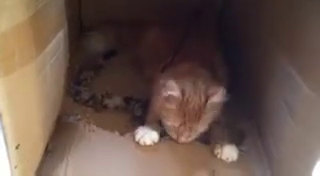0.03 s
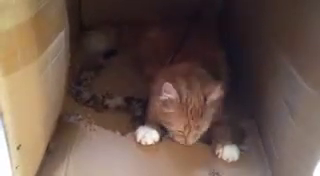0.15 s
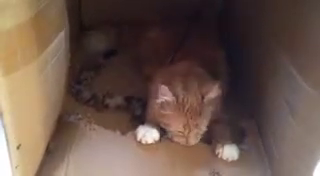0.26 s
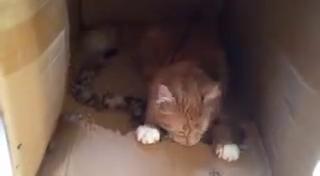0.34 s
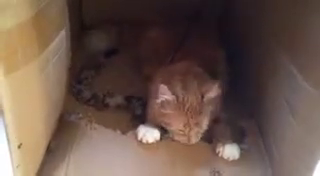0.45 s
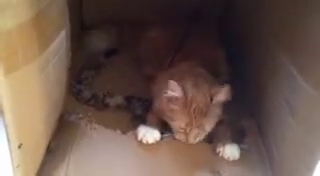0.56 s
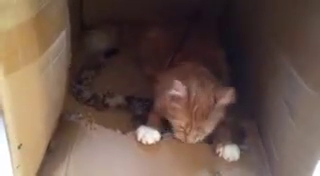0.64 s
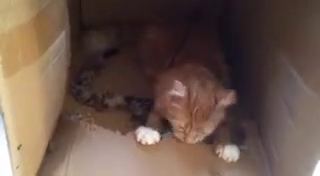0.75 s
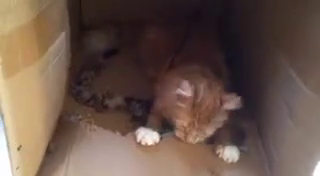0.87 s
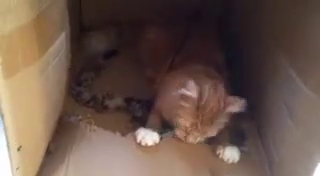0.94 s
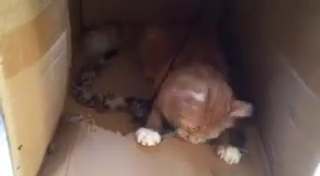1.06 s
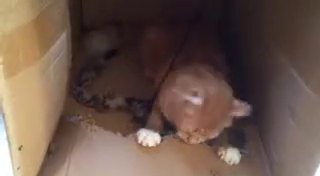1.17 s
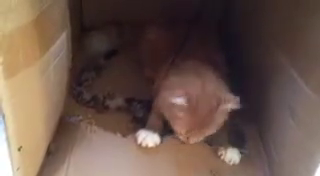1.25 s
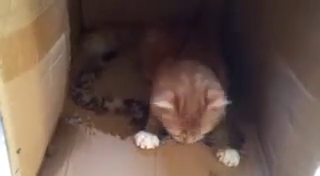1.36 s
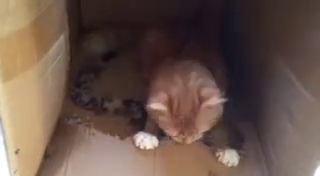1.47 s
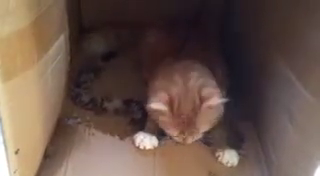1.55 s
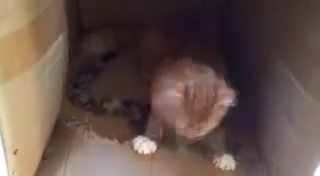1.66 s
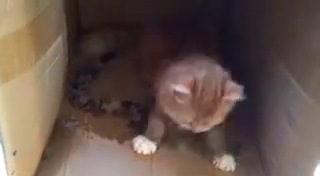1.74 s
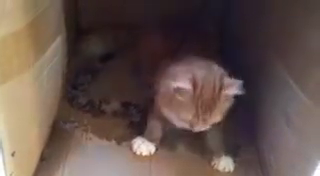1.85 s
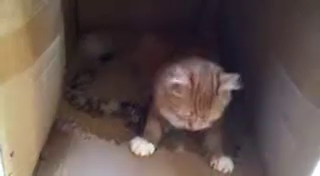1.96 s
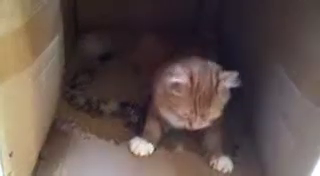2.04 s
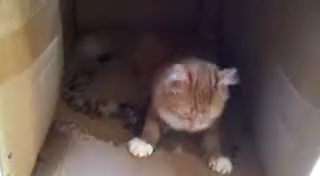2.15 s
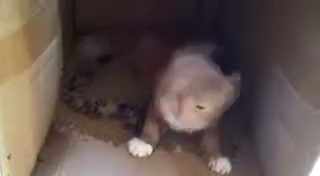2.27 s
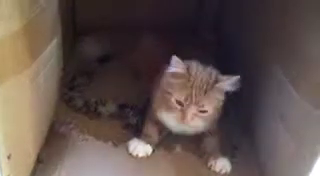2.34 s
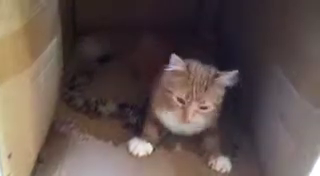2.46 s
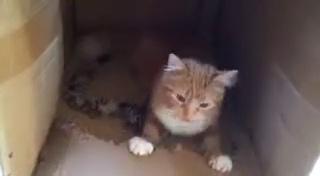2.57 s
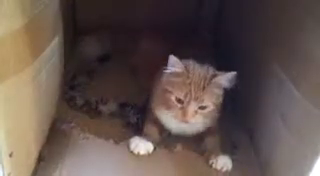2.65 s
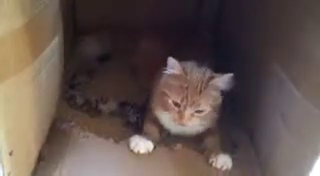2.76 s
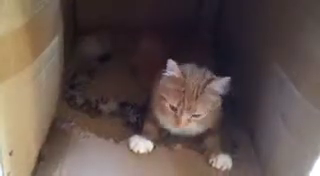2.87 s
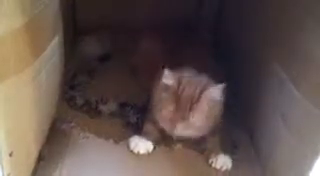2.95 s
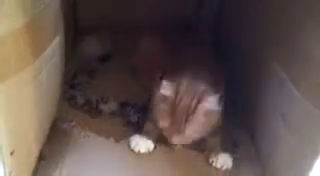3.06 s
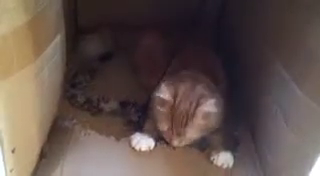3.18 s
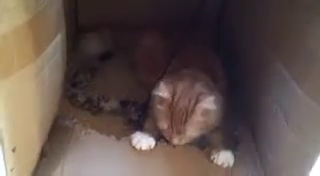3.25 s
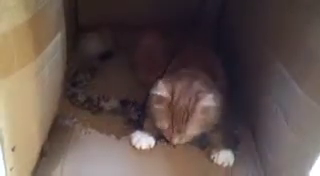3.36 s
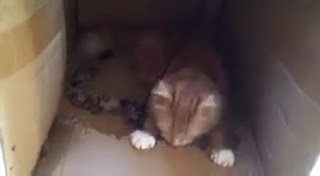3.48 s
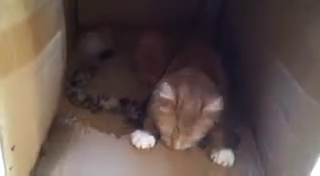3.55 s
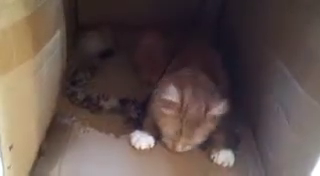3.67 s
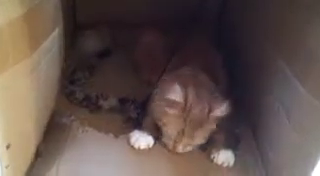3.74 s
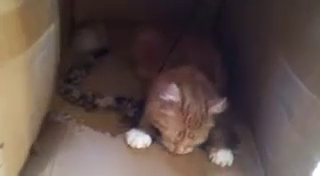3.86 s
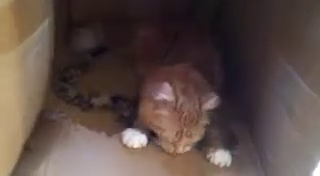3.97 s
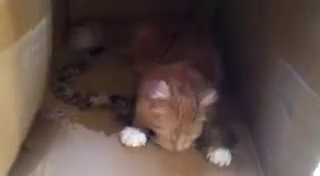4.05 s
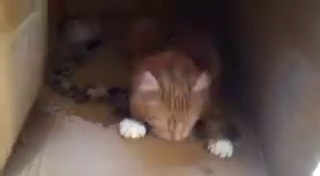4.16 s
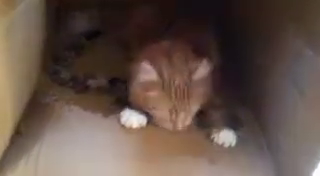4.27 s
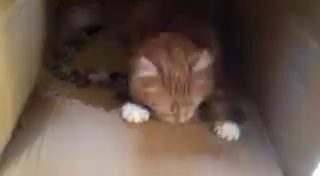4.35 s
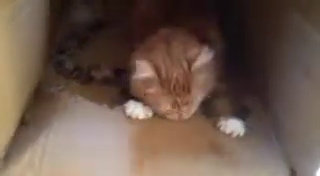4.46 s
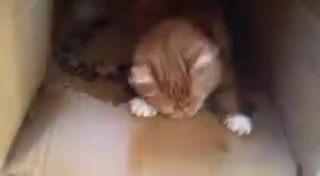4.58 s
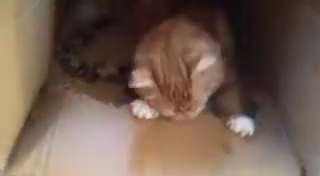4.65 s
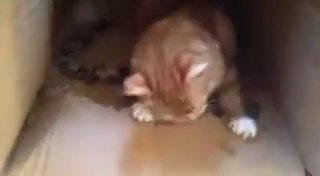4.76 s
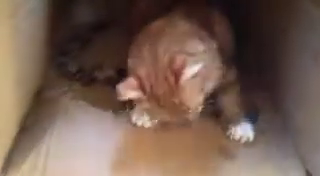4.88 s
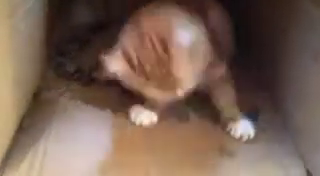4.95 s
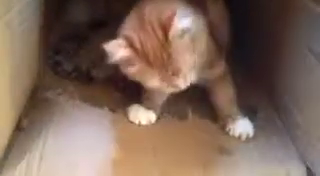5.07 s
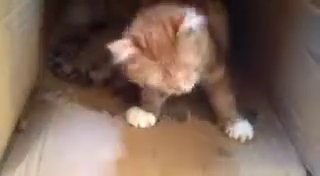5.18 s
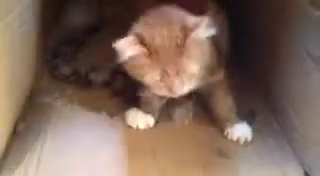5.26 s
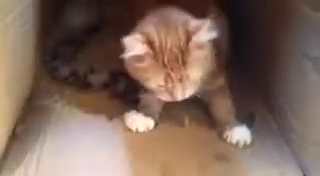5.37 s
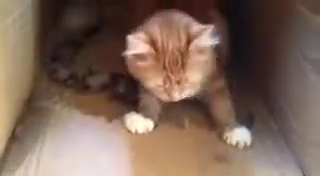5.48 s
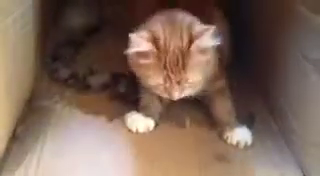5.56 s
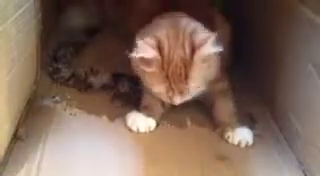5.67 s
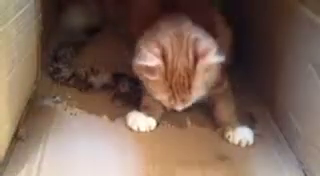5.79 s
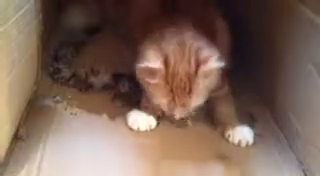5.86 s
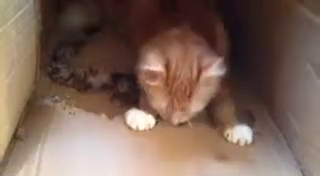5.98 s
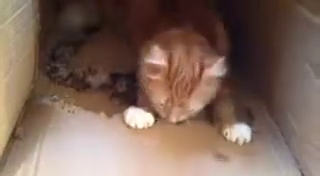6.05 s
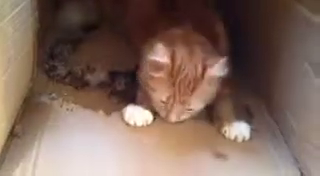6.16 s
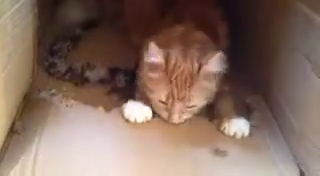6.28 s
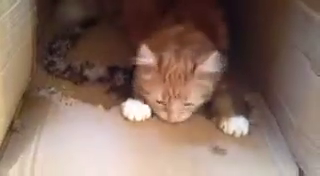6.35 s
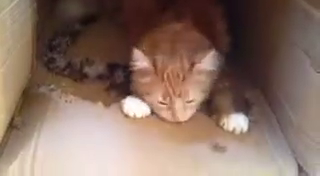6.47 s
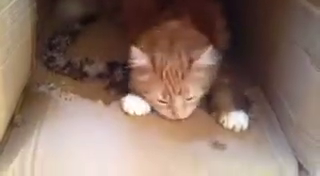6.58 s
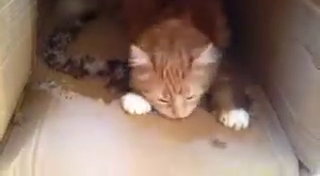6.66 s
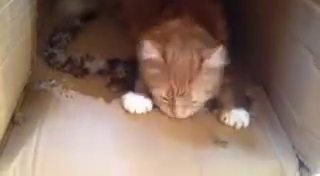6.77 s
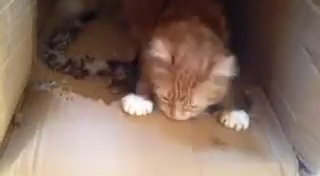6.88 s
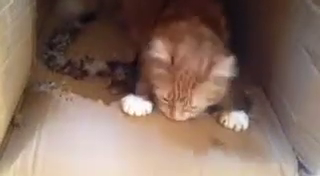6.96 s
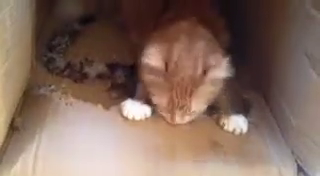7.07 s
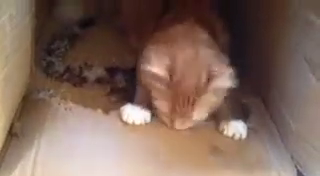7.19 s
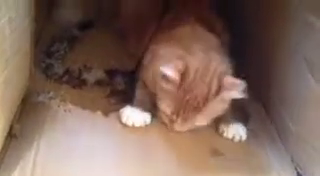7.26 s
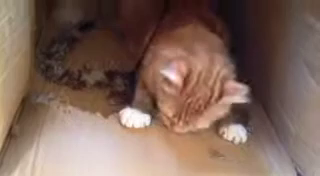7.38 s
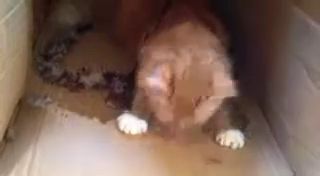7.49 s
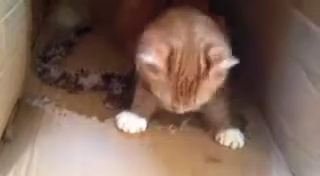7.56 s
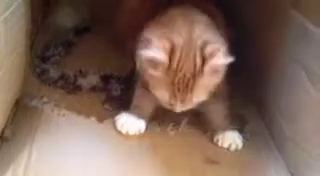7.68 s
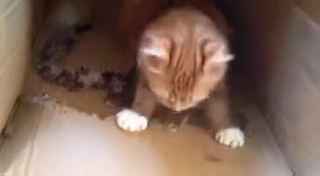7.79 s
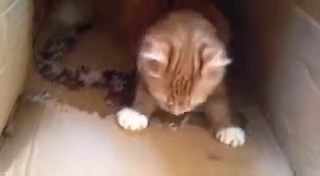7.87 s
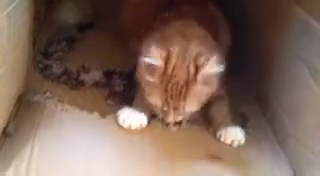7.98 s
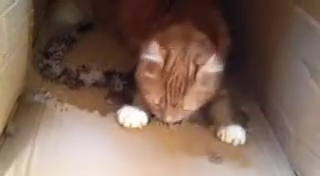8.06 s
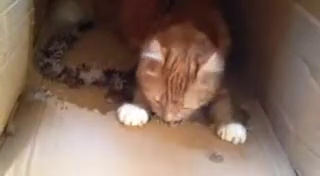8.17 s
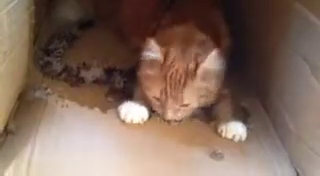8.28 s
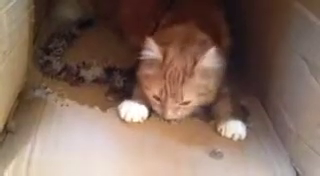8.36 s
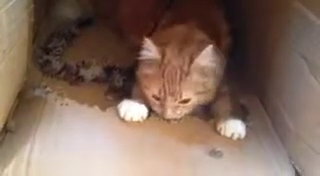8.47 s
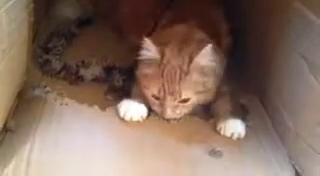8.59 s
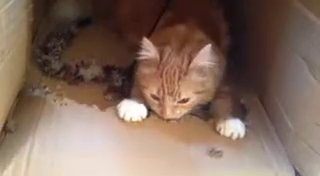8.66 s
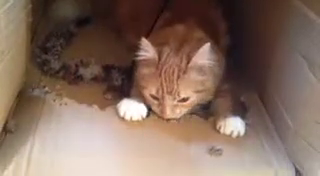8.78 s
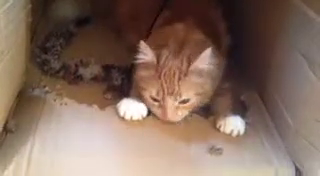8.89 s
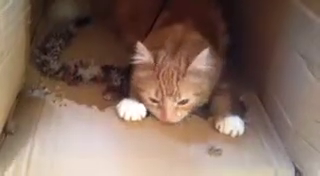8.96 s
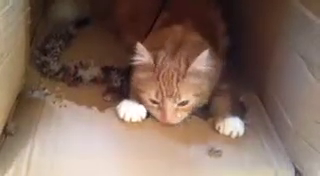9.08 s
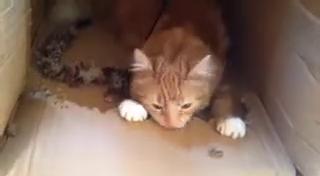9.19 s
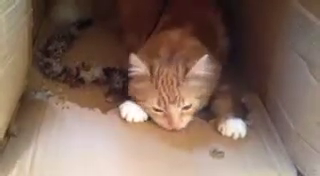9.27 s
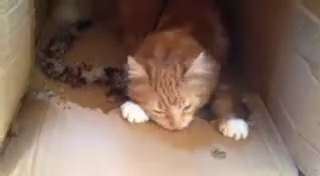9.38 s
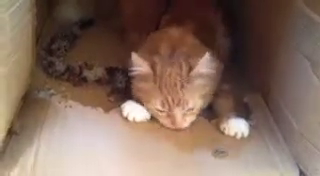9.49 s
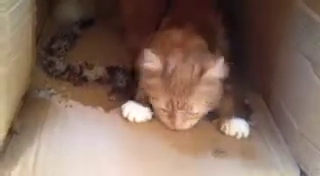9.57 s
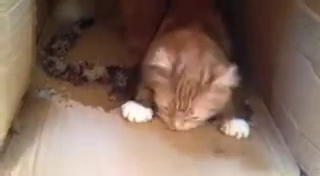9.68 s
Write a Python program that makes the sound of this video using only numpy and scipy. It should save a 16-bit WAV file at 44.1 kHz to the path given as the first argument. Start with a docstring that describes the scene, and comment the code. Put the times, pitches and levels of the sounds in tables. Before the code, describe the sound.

Soft paw scuffs and crackly claw tugs on cardboard, broken three times by a loud, hollow slap as a flap lets go.

```python
"""A kitten claws at the torn floor of a cardboard box, in bouts of tugging that build up.
Paper fibres break in short rips and ticks that ring the board; paws rub and sweep over it.
Three times the strained flap lets go and slaps down with a hollow thump.
A quiet, bare room answers each sound, over a soft steady background."""
import sys
import numpy as np
from scipy import signal
from scipy.fft import rfft, irfft
from scipy.io import wavfile

SR = 44100
rng = np.random.default_rng(int(sys.argv[2]) if len(sys.argv) > 2 else 0)


def unload_audio(sound):
    """Save the sound as a 16-bit wav file, at the path given as the first command line argument."""
    columns = np.transpose(np.atleast_2d(sound))
    # keep every value between -1 and 1, then stretch to whole-number steps
    steps = np.round(np.clip(columns, -1, 1) * 32767)
    wavfile.write(sys.argv[1], SR, steps.astype(np.int16))


N = 429093
LEAD_S = 0.02   # run-up ahead of each rip

# spectrum of a breaking fibre: freq_hz, density_db
FIBRE_SPECTRUM = [(60, -22), (110, -15), (170, 7.5), (320, -2), (700, -3), (1400, -1), (2500, -5),
                  (5000, -4.5), (8500, -4), (9600, -7.5), (11000, -22), (12500, -30)]
# flap slaps: start_s, thump_db, landing_delay_s, landing_db, bite_db, edge_hz, edge_db
FLAP_SLAPS = [(1.6994, -12.5, 0.016, -22, -3, 450, -16.5), (4.9264, -14.5, 0.0095, -25.5, 1, 1077, -16.5),
              (7.541, -14, .006, -19, -11, 1530, -43)]


def from_db(db):
    """Decibels to gain."""
    return 10 ** (np.asarray(db) / 20)


def unit_rms(x):
    """Scale each row to rms 1."""
    return x / np.sqrt(np.mean(x ** 2, axis=-1, keepdims=True) + 1e-30)


def at_hz(points, hz):
    """Read a table on a log-frequency axis."""
    freq_hz, value = np.transpose(points)
    return np.interp(np.log(np.maximum(hz, 1)), np.log(freq_hz), value)


def butter(x, hz, kind, order=2):
    """Causal Butterworth filter."""
    return signal.sosfilt(signal.butter(order, hz, kind, fs=SR, output="sos"), x + 1e-18)


def min_phase(spectrum, size=4096):
    """Minimum-phase impulse response of a spectrum."""
    cepstrum = irfft(np.log(from_db(at_hz(spectrum, np.fft.rfftfreq(size, 1 / SR)))))
    cepstrum[1:size // 2] *= 2
    cepstrum[size // 2 + 1:] = 0
    return irfft(np.exp(rfft(cepstrum)))


def resonate(x, hz, width_hz, lift_db):
    """A resonance lifts one band."""
    r, angle = np.exp(-np.pi * width_hz / SR), 2 * np.pi * hz / SR
    ring = signal.lfilter([1, 0, -1], [1, -2 * r * np.cos(angle), r * r], x) * (1 - r * r) / 2
    return x + (from_db(lift_db) - 1) * ring


def drift(per_s):
    """Slow random curve, rms 1."""
    knots = rng.standard_normal(4000)
    return unit_rms(np.interp(np.arange(N) / SR * per_s, np.arange(len(knots)), knots))


def add(out, start_s, sound):
    """Mix a sound in at start_s."""
    start = max(round(start_s * SR), 0)
    out[start:start + len(sound)] += sound[:max(N - start, 0)]


def room_air(level_db=-68):
    """Soft steady background of the room."""
    # still air: freq_hz, density_db
    air_spectrum = [(30, -36), (45, -25), (65, -13), (90, -4), (180, 4), (260, -0.5), (400, -10),
                    (1000, -11), (2400, -14), (4000, -17.5), (8000, -25), (10000, -33), (12500, -43)]
    noise = signal.oaconvolve(rng.standard_normal(N), min_phase(air_spectrum))[:N]
    return from_db(level_db) * unit_rms(noise)


def room_reverb(x, first_echo_s=0.0094, build_s=0.0024):
    """Diffuse echoes build after the first wall; each band dies at its own pace."""
    # room decay: freq_hz, t60_s
    decay_times = [(100, 0.44), (230, 0.64), (700, 0.94), (1800, 0.89), (4800, 0.77), (9000, 0.43)]
    # reverb against direct sound: freq_hz, level_db
    reverb_levels = [(90, -10), (150, -12.5), (200, -6), (255, -3), (340, -11), (1000, -12), (3000, -12.5),
                     (9000, -15.5)]
    t = np.arange(SR) / SR
    white = rng.standard_normal((2, SR))
    edges_hz = np.geomspace(70, 13000, 30)
    onset = 1 - np.exp(-np.maximum(t - first_echo_s, 0) / build_s)
    tail = np.zeros(SR)
    for k, (low, high) in enumerate(zip(edges_hz, edges_hz[1:])):
        hz = np.sqrt(low * high)
        decay = np.exp(-np.log(1000) * t / at_hz(decay_times, hz))
        band = butter(white[k % 2], [low, high], "band", order=3) * onset * decay
        tail += from_db(at_hz(reverb_levels, hz)) * np.sqrt(2 * (high - low)) / SR * unit_rms(band)
    return signal.oaconvolve(x, tail)[:N]


def box_walls(x, delay_range_s=(0.0012, 0.011), echo_db=-13, bounce_db=-0.5, lowest_hz=600, count=7):
    """Close walls add quick, hollow echoes; lows pass through the card."""
    delays_s = np.sort(rng.uniform(*delay_range_s, count))
    gains = from_db(bounce_db * np.arange(count))
    gains = from_db(echo_db) * gains / np.linalg.norm(gains)
    out, reflected = x.copy(), butter(x, lowest_hz, "high")
    for delay_s, gain in zip(delays_s, gains):
        add(out, delay_s, gain * reflected)
    return out / np.sqrt(1 + np.sum(gains ** 2))


def box_responses(snap, panel_hz=(126, 311), board_top_hz=2620, spot_db=1.5, detune=0.022):
    """A snap as panel boom, board rasp and paper crackle; each spot rings its own way."""
    # box resonances: freq_hz, width_hz, lift_db
    box_modes = [(209.4, 28, 5), (400, 64.5, 11.5), (598, 89, 9), (858, 140, 7), (1144, 82, 6),
                 (1738, 58, 8), (2026, 90, 1.5), (2277, 110, 5), (2635, 52, 3), (2950, 60, 6),
                 (3774, 540, 4.5), (4850, 560, 4.5), (6100, 320, 2), (7470, 2100, 6)]
    for hz, width_hz, lift_db in box_modes:
        pitch_dev, lift_dev = rng.standard_normal(2)
        snap = resonate(snap, hz * (1 + detune * pitch_dev), width_hz, lift_db + spot_db * lift_dev)
    boom = butter(snap, panel_hz, "band", order=3)
    rasp = butter(snap, [panel_hz[1], board_top_hz], "band", order=4)
    crackle = butter(snap, board_top_hz, "high", order=4)
    return boom, rasp, crackle


def fibre_breaks(per_s, spread_db, size):
    """Fibres give way at random: many small impulses, a few large."""
    chance, strength, sign = rng.random((3, size))
    out, breaks = np.zeros(size), chance < per_s / SR
    level_db = spread_db * np.minimum(-np.log(1 - strength[breaks]), 4)
    out[breaks] = from_db(level_db) * np.sign(sign[breaks] - 0.5)
    return out


def paw_gains(rest_db=-75, fade_db_per_s=198.5, sweep_edge_db=3.5, boom_db=-6.5, boom_loss=0.8):
    """Boom, rasp and crackle gains from rest, tugs and sweeps. Bite is crackle over rasp."""
    # bouts of tugging, one curve each: time_s, rasp_db, crackle_db
    tug_bouts = [
        [(0.0, -63, -64), (0.59, -61.5, -67.5), (0.706, -61, -87.5), (0.832, -62.5, -62.5), (1.114, -62, -60.5),
         (1.396, -66.5, -63.5), (1.66, -67, -58)],
        [(3.92, -65, -78), (4.232, -53, -55.5), (4.32, -55.5, -59.5), (4.392, -55, -65), (4.564, -65, -56),
         (4.784, -52, -49.5), (4.9, -53.5, -46)],
        [(5.75, -67, -70.5), (6.402, -63, -58), (6.562, -63, -68.5), (6.936, -54.5, -52.5), (7.2, -57.5, -57.5),
         (7.386, -56, -56.5), (7.51, -51.5, -52)],
        [(7.95, -63.5, -68), (8.212, -57.5, -61), (8.45, -75, -73)],
        [(9.12, -57.5, -67.5), (9.188, -54, -60), (9.33, -57, -64.5), (9.436, -57, -64), (9.568, -51.5, -54.5),
         (9.73, -46, -48)],
    ]
    # paw sweeps over the floor: centre_s, half_length_s, level_db, bite_db
    paw_sweeps = [(0.057, 0.034, -67.5, -20), (0.19, 0.026, -59, -2), (0.285, 0.028, -66, -12),
                  (0.552, 0.075, -61.5, -6.5), (0.666, 0.04, -54, -1), (0.819, 0.01, -65.5, 9),
                  (1.483, 0.021, -63.5, 9), (2.306, 0.03, -68, 0), (2.923, 0.045, -73, 2.5),
                  (3.297, 0.12, -70, 1.5), (3.635, 0.064, -62.5, -4.5), (3.92, 0.057, -60.5, -4.5),
                  (4.11, 0.056, -54.5, -9), (4.442, .035, -57, -3), (4.52, 0.052, -55.5, 3.5),
                  (6.365, 0.037, -57, -12), (6.475, 0.033, -52.5, -6), (7.11, 0.05, -49.5, -4.5),
                  (8.085, 0.052, -61.5, -6), (8.34, 0.03, -60.5, -7.5), (8.879, 0.025, -55.5, -3.5),
                  (9.214, 0.058, -55.5, -8.5), (9.423, 0.037, -49.5, -5)]
    t = np.arange(0, N, 40) / SR
    moves = [(np.full(len(t), rest_db), -0.5)]   # rasp_db, bite_db
    for bout in tug_bouts:
        time_s, rasp_db, crackle_db = np.transpose(bout)
        rasp_db = np.interp(t, time_s, rasp_db) - 2.5
        crackle_db = np.interp(t, time_s, crackle_db) - 2.07
        outside_s = np.abs(t - np.clip(t, time_s[0], time_s[-1]))
        moves.append((rasp_db - fade_db_per_s * outside_s, crackle_db - rasp_db))
    for centre_s, half_length_s, level_db, bite_db in paw_sweeps:
        distance = np.minimum(np.abs(t - centre_s) / half_length_s, 10)
        moves.append((level_db - sweep_edge_db * distance ** 2, bite_db))
    # a flat paw booms the panel; biting claws less so
    power = sum(from_db([db + boom_db - boom_loss * bite_db, db, db + bite_db]) ** 2
                for db, bite_db in moves)
    return [np.interp(np.arange(N) / SR, t, gain) for gain in np.sqrt(power)]


def paw_rubbing(uneven_db=2.5, wander_db=4.5, snag_db=4, snag_s=0.0031, trim_db=-1, spots=3):
    """Paws and fur drag on paper: dense tiny slips under uneven pressure, with brief claw snags."""
    grip_db = uneven_db * drift(per_s=67)
    layers = np.zeros((3, N))
    for _ in range(spots):
        catches = np.abs(fibre_breaks(per_s=14, spread_db=1, size=N))
        snags = signal.lfilter([1], [1, -np.exp(-1 / (snag_s * SR))], catches + 1e-18)
        slips = fibre_breaks(per_s=2400, spread_db=3, size=N)
        slips *= from_db(grip_db + wander_db * drift(per_s=14))
        slips *= 1 + from_db(snag_db) * snags
        for layer, response in zip(layers, box_responses(min_phase(FIBRE_SPECTRUM))):
            layer += signal.oaconvolve(slips, response)[:N]
    return from_db(trim_db) * sum(gain * unit_rms(layer) for layer, gain in zip(layers, paw_gains()))


def flap_thumps(sharpness=3.8, edge_swell_cycles=2.2, size=4096):
    """The slapped floor pumps the box's air for a few swings while the flap's edge rings."""
    # floor modes: freq_hz, relative_db, swell_s
    floor_modes = [(203.4, 3, 0.0068), (138, -9.5, 0.013)]
    out, t = np.zeros(N), np.arange(size) / SR
    for start_s, thump_db, *_, edge_hz, edge_db in FLAP_SLAPS:
        modes = [(hz, thump_db + db, swell_s) for hz, db, swell_s in floor_modes]
        modes.append((edge_hz, edge_db, edge_swell_cycles / edge_hz))
        for hz, db, swell_s in modes:
            envelope = (t / swell_s * np.exp(1 - t / swell_s)) ** sharpness
            add(out, start_s, from_db(db) * envelope * np.sin(2 * np.pi * hz * t))
    return butter(out, hz=110, kind="high", order=6)


def strip_snap(strip_hz, ring_db, q=6.5, tilt_from_hz=4000):
    """A torn strip rings at its own pitch; long, low strips fizz less than short ones."""
    hz, density_db = np.transpose(FIBRE_SPECTRUM)
    db_per_octave = 3 * np.clip(np.log2(strip_hz / tilt_from_hz), -1, 1)
    tilt_db = db_per_octave * np.maximum(np.log2(hz / tilt_from_hz), 0)
    snap = min_phase(np.column_stack([hz, density_db + tilt_db]))
    return resonate(snap, strip_hz, strip_hz / q, ring_db)


def rip(snap, level_db, bite_db, boom_db, length_s, linger_s=0.012, creep_s=0.0037, size=4096):
    """A run of fibres breaks; boom and bite are relative to level_db. One row per box side."""
    t = np.arange(size) / SR - LEAD_S
    after_s = np.maximum(t, 0)
    progress = after_s / length_s
    onset = 1 - np.exp(-progress / 0.057)
    main_run = np.exp(-1.66 * progress ** 2)
    stragglers = 0.19 * np.exp(-after_s / (length_s + linger_s))
    weakest_fibres = 0.17 * np.exp(-np.abs(t) / creep_s)
    strain = onset * (main_run + stragglers) + weakest_fibres
    gains = from_db(level_db + np.array([boom_db, 0, bite_db])) * np.sqrt(length_s * SR / size)
    responses = box_responses(snap)
    bursts = strain * np.array([fibre_breaks(per_s=6000, spread_db=4.5, size=size) for _ in range(3)])
    bands = [signal.fftconvolve(bursts, response[None], axes=1)[:, :size] for response in responses]
    return sum(gain * unit_rms(band) for band, gain in zip(bands, gains))


def claw_tick(level_db, bite_db, base_hz=3100, top_hz=7500, bite_db_per_octave=10):
    """A claw tip plucks one small strip; a sharper bite rings higher."""
    strip_hz = min(base_hz * 2 ** (bite_db / bite_db_per_octave), top_hz)
    return rip(strip_snap(strip_hz, ring_db=8), level_db, bite_db, boom_db=-14, length_s=0.0047)


def clawing():
    """Rips, flap landings and claw ticks all break fibres. One row per box side."""
    # claws rip the board: start_s, length_s, level_db, boom_db, bite_db, strip_hz
    claw_rips = [(0.191, 0.025, -51.5, 1, -5.5, 1080), (0.777, 0.0036, -46, -4, -3, 1620),
                 (1.697, .004, -29.5, -2.5, -20, 470), (1.7024, 0.0092, -21, -15.5, -8.5, 440),
                 (4.166, 0.0097, -45.5, -12.5, -2, 770), (4.178, 0.013, -45, -4.5, 0.5, 2100),
                 (4.186, .012, -41.5, 0, -5.5, 1020), (4.253, 0.0067, -46, 1.5, -9, 1890),
                 (4.319, 0.0076, -43.5, -7.5, -9.5, 437), (4.343, .0085, -45.5, -8.5, -1, 5350),
                 (4.366, 0.0092, -41.5, 6.5, -5, 417), (4.393, .007, -43, -13, -4, 1840),
                 (4.539, .009, -38.5, -12.5, 3, 5840), (4.636, 0.011, -48, -9.5, -30, 620),
                 (4.701, 0.0049, -42.5, -29, -0.5, 1030), (4.754, 0.0043, -32, -34.5, -2.5, 1040),
                 (4.849, 0.0041, -45, -23.5, -4, 1200), (4.923, 0.0084, -22.5, -11.5, -2.5, 1105),
                 (4.929, 0.0023, -19, 2, 2, 700), (6.514, 0.012, -48, -2, -15, 604),
                 (6.594, 0.012, -43.5, -2.5, -3.5, 560), (6.66, 0.024, -41, -6.5, -0.5, 2860),
                 (6.706, 0.0073, -46, -1, -11, 604), (6.769, 0.0046, -36.5, -5.5, -8, 557),
                 (6.849, 0.027, -47, -3.5, -4.5, 1190), (6.897, 0.024, -39.5, -1, -2.5, 1790),
                 (6.951, 0.012, -48, -0.5, -11, 485), (7.051, 0.011, -38, -6, -3.5, 1850),
                 (7.091, 0.009, -46, -11, -6.5, 1920), (7.266, 0.018, -46, -2.5, 1, 2060),
                 (7.3768, 0.0034, -19.5, -10, -4, 1290), (7.5377, 0.0054, -19, -19, -2.5, 1550),
                 (8.898, 0.0053, -43, -4, -11.5, 1140), (9.379, 0.025, -43.5, -9.5, -4, 1120),
                 (9.41, 0.004, -37.5, -4, 0, 2410), (9.436, 0.013, -39.5, -21, -3, 1080),
                 (9.455, 0.012, -46.5, -10, -0.5, 1170), (9.53, 0.0052, -44.5, 2, -0.5, 2880),
                 (9.557, 0.025, -51, -3, -0.5, 4670), (9.613, 0.0096, -42, -3, -9, 1050),
                 (9.671, 0.0092, -42.5, 0, -5, 900), (9.684, 0.01, -37.5, -12, -4.5, 1010)]
    # claw tips click on paper: start_s, level_db, bite_db
    claw_ticks = [(.032, -58, -12), (.655, -48.5, -8), (1.095, -67.5, 15), (1.281, -54, 2),
                  (1.344, -57.5, 4.5), (1.381, -61.5, 12), (1.434, -53.5, -7.5), (1.443, -63.5, 12),
                  (1.523, -64.5, 13), (2.2, -69, 7), (2.493, -57, -19), (2.8657, -54.5, 2),
                  (3.038, -71, 10.5), (3.262, -66.5, 9.5), (3.294, -61.5, 12.5), (3.337, -63, 9),
                  (3.424, -69.5, 12), (3.573, -63, 11.5), (3.616, -64, 9), (5.05, -57.5, 13),
                  (5.419, -49.5, -4.5), (5.556, -52.5, -0.5), (5.741, -60, 2.5), (5.956, -50.5, 3),
                  (6.34, -59.5, 6), (7.218, -56, 16), (7.243, -57.5, 11.5), (8.058, -51, -9),
                  (8.108, -51.5, -1.5), (8.172, -54.5, -6.5), (8.284, -49.5, -6.5), (8.794, -55.5, -10),
                  (9.367, -48, -6)]
    events = []
    for start_s, length_s, level_db, boom_db, bite_db, strip_hz in claw_rips:
        snap = strip_snap(strip_hz, ring_db=9)
        events.append((start_s, rip(snap, level_db, bite_db, boom_db, length_s)))
    for start_s, _, delay_s, landing_db, bite_db, edge_hz, _ in FLAP_SLAPS:
        snap = strip_snap(edge_hz, ring_db=4.5)
        events.append((start_s + delay_s, rip(snap, landing_db, bite_db, boom_db=-10, length_s=0.0049)))
    events += [(start_s, claw_tick(level_db, bite_db)) for start_s, level_db, bite_db in claw_ticks]
    sides = np.zeros((3, N))
    for start_s, sounds in events:
        for side, sound in zip(sides, sounds):
            add(side, start_s - LEAD_S, sound)
    return sides


def scene():
    """The box's open side faces the microphone; every side feeds the room."""
    sides, rubbing, thumps = clawing(), paw_rubbing(), flap_thumps()
    reverb = sum(room_reverb(side + rubbing + thumps) for side in sides) / np.sqrt(len(sides))
    return (box_walls(sides[0]) + rubbing + thumps + reverb + room_air())[None]


def record(dry, ceiling=0.52, stopband_hz=12700):
    """A small microphone rounds the highest peaks; the top treble is cut."""
    rounded = ceiling * np.tanh(dry / ceiling)
    return signal.sosfilt(signal.cheby2(14, 60, stopband_hz, fs=SR, output="sos"), rounded)


dry = scene()
out = record(dry)
unload_audio(out)
```